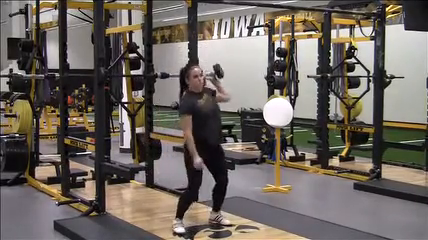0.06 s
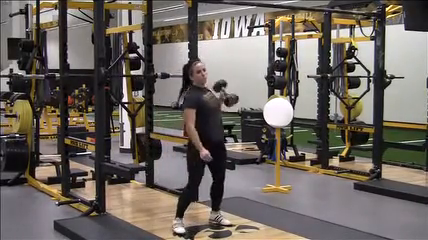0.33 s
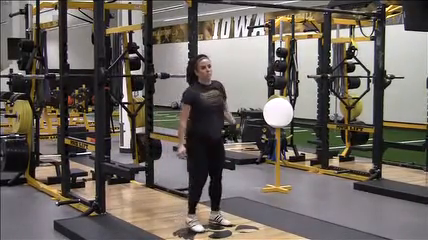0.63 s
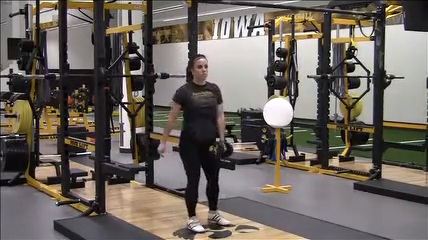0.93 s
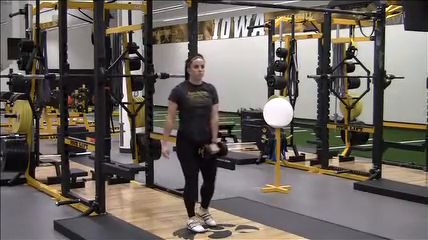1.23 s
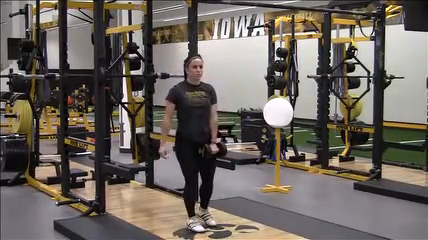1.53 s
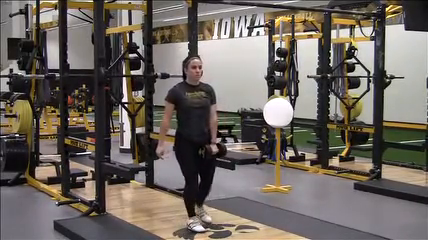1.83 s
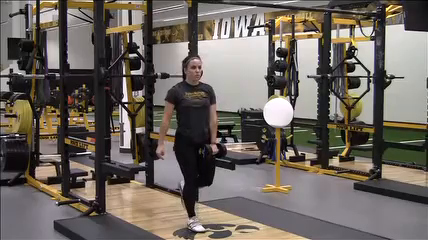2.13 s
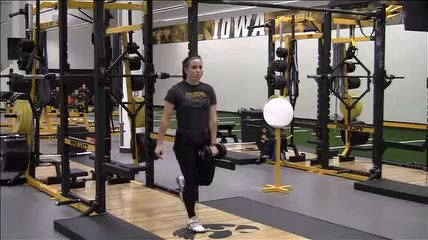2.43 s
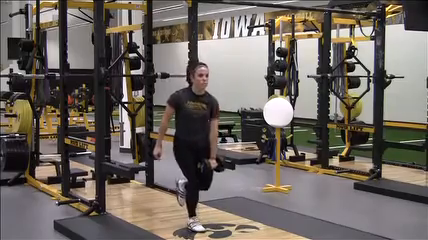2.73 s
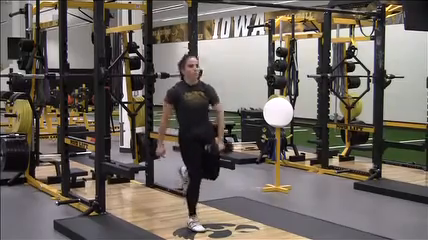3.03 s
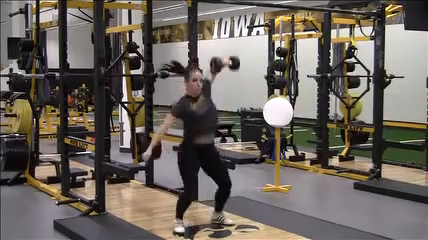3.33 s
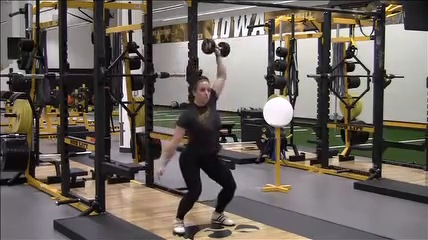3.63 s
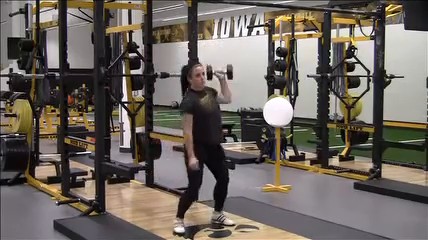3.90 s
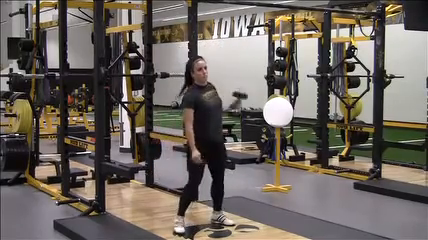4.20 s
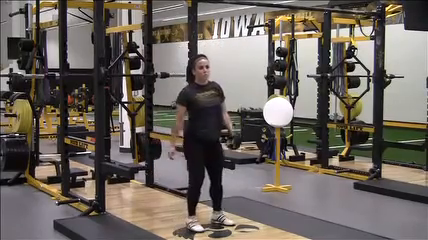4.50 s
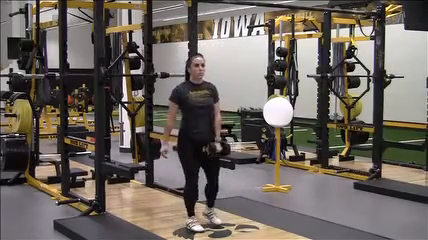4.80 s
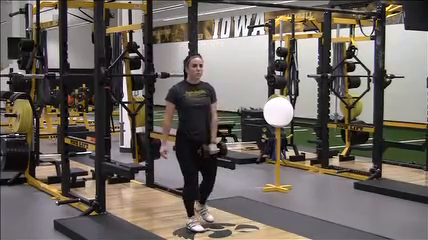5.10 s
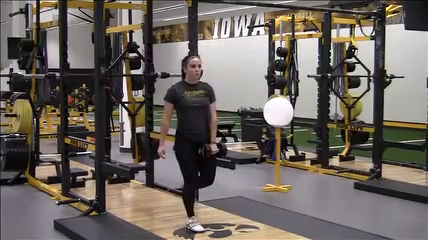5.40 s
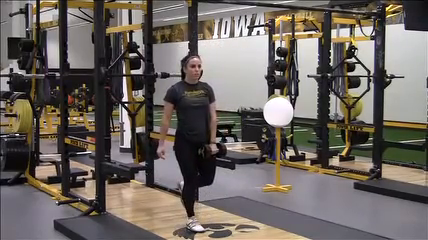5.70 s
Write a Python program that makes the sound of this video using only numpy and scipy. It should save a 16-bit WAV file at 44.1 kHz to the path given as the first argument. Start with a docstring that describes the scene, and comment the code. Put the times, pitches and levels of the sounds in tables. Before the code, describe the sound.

Ventilation rumbles steadily in a large, hard-walled weight room, with faint wavering fan tones. A little past halfway, a lifter's feet land on a wooden platform, making one sharp thud with a slap of flat soles and a knock of boards. The microphone picks up plenty of the room: quick wall echoes, a low boom and faint ringing from steel racks, all fading over about two seconds beneath the ventilation.

```python
"""Ventilation rumbles, with faint fan tones, all the way through in a large, hard weight room.
About 3.5 s in, a lifter catching a dumbbell overhead lands on a wooden platform: a toe touches,
then two hard heels strike 7 ms apart. The boards knock, the soles slap and the walls echo.
The hall rings on with a low boom, and the steel racks ring faintly."""
import sys
import numpy as np
from scipy import signal
from scipy.fft import rfft, irfft
from scipy.io import wavfile

SR = 44100
rng = np.random.default_rng(int(sys.argv[2]) if len(sys.argv) > 2 else 0)


def transcribe(signal):
    """Save signal, clipped to [-1, 1], as a 16-bit WAV file at the path in sys.argv[1]."""
    frames = np.atleast_2d(signal).T
    limited = np.clip(frames, -1, 1)
    pcm = np.round(limited * 32767).astype(np.int16)
    wavfile.write(sys.argv[1], SR, pcm)


N = 253575
TIME = np.arange(N) / SR

# Toe, heel, heel. Each row: start in seconds, push in dB, contact time in seconds, sole slap in dB.
FOOT_CONTACTS = [(3.5123, -31, .0015, -34), (3.5158, -6.5, 0.00074, -8), (3.5227, -6, 0.001415, -2.5)]
FIRST_HEEL_S = FOOT_CONTACTS[1][0]


def gain_of(db):
    """Turns decibels into a number to multiply a sound by."""
    return 10 ** (np.asarray(db) / 20)


def evened(x):
    """Scales a signal to an average size (rms) of 1."""
    return x / np.sqrt(np.mean(x ** 2) + 1e-20)


def read(points, hz):
    """Reads between a table's rows, giving each octave equal room."""
    row_hz, value = np.transpose(points)
    return np.interp(np.log(hz + 1), np.log(row_hz + 1), value)


def add(mix, start_s, sound):
    """Mixes a sound in at its start time."""
    part = mix[max(round(start_s * SR), 0):][:len(sound)]
    part += sound[:len(part)]


def coloured(x, spectrum):
    """Turns each frequency up or down as a table says."""
    hz = np.fft.rfftfreq(len(x), 1 / SR)
    return irfft(rfft(x) * gain_of(read(spectrum, hz)), len(x))


def noise(spectrum, size):
    """Noise of average size 1, coloured by a table."""
    return evened(coloured(rng.standard_normal(size), spectrum))


def drift(rate_hz):
    """A slow random wander of average size 1."""
    hz = np.fft.rfftfreq(N, 1 / SR)
    return evened(irfft(rfft(rng.standard_normal(N)) * np.exp(-(hz / rate_hz) ** 2), N))


def ventilation(air_db=-36.5, swell_db=0.38, waver=0.99, wander_radians=0.68):
    """Air rumbles and hisses in the ducts, and the fans hum with wavering tones."""
    # Duct noise. Each row: frequency in Hz, relative level in dB.
    air_colour = [(12, -13), (33, -1.5), (58, 2), (88, -6.5), (112, -6), (190, -11.5), (330, -12),
                  (480, -18.5), (950, -26.5), (1650, -32.5), (2300, -41), (3200, -40.5), (6000, -45),
                  (10000, -48)]
    # Fan tones. Each row: pitch in Hz, average level in dB before the wavering.
    fan_tones = [(59.2, -53.5), (285, -59), (520, -68), (635.2, -62), (1031, -71), (1410, -73.5)]
    air = gain_of(air_db) * noise(air_colour, size=N) * gain_of(swell_db * drift(rate_hz=3.8))
    hum = np.zeros(N)
    for hz, db in fan_tones:
        level = np.sqrt(2) * gain_of(db) * (1 + waver * drift(rate_hz=2.6))
        hum += level * np.sin(2 * np.pi * hz * TIME + wander_radians * drift(rate_hz=1.7))
    return air + hum


def feet(thump_db=-7, slap_db=-8, scuff_db=-37, scuff_s=0.0097):
    """Each contact is a short push that rings the boards, with a slap as the sole closes on the wood."""
    # The boards' tones. Each row: pitch in Hz, relative level in dB, seconds to fade by 60 dB.
    board_tones = [(104, -32, 0.15), (200, -21, 0.064), (334, -19, 0.12), (470, -19, 0.022),
                   (729, -21, 0.1), (1040, -20, .06), (1484, -5.5, 0.025), (1680, -1, 0.025),
                   (1850, -16, 0.017), (2050, -11, 0.034)]
    # A flat sole's slap. Each row: frequency in Hz, boost or cut in dB.
    slap_colour = [(200, -6), (900, 7), (2400, -3), (3500, 10), (4600, 0), (5700, 1.5), (7500, -7.5),
                   (9400, -8.5), (10500, -16)]
    t, knocks, slaps = TIME[:SR // 2], np.zeros(N), np.zeros(N)
    boards = sum(gain_of(db - 60 * t / fade_s) * np.cos(2 * np.pi * hz * t)
                 for hz, db, fade_s in board_tones)
    for start_s, push_db, contact_s, sole_db in FOOT_CONTACTS:
        force = np.sin(np.pi * np.minimum(t / contact_s, 1)) ** 2  # a longer, softer push sounds duller
        ring = signal.fftconvolve(force / force.sum(), boards)[:len(t)]
        add(knocks, start_s, -gain_of(push_db) * (gain_of(thump_db) * force + ring))
        click = gain_of(slap_db) * (t == 0)
        scuff = gain_of(scuff_db) * np.exp(-t / scuff_s) * rng.standard_normal(len(t))  # the sole settles
        add(slaps, start_s + contact_s / 2, gain_of(sole_db) * (click + scuff))
    return knocks + coloured(slaps, slap_colour)


def wall_echoes(sound, band_hz=(350, 5500), nearest_s=0.008, farthest_s=0.041, scatter_db=-18.5, count=7):
    """Near walls and equipment throw the sound back, thinner and a little duller."""
    # One clear echo from each of the two nearest walls. Each row: delay in seconds, relative level in dB.
    near_walls = [(.0292, -7.5), (0.0346, -7.5)]
    echo = signal.lfilter(*signal.butter(1, band_hz, "bandpass", fs=SR), sound)
    out = np.zeros(N)
    for delay_s, db in near_walls:
        add(out, delay_s, gain_of(db) * echo)
    for place in (np.arange(count) + rng.random(count)) / count:  # weak echoes off racks and benches
        add(out, nearest_s + place * (farthest_s - nearest_s), gain_of(scatter_db) * echo)
    return out


def hall_ring(level_db=-28, build_s=0.011, early_db=-3, early_s=0.05,
              far_db=1.5, far_delay_s=0.23, far_spread_s=0.11):
    """Countless echoes blur together, swell as the far walls answer, then fade, the treble first."""
    # The landing as it spreads through the hall. Each row: frequency in Hz, relative level in dB.
    hall_colour = [(40, -14), (100, 3), (170, 0), (340, 3), (520, -3), (700, 1.5), (920, -3), (1060, 1),
                   (1220, -3.5), (1420, -3.5), (1750, -7), (2000, -10.5), (2400, -13.5), (3100, -18),
                   (3800, -19), (5500, -26.5), (7000, -35), (10000, -49)]
    # How long the hall rings. Each row: frequency in Hz, seconds to fade by 60 dB.
    fade_times = [(100, 3.4), (300, 3.13), (700, 2.75), (1500, 3.11), (3000, 2.6), (5000, 1.64),
                  (9000, 0.67)]
    size, out = 5 * SR // 2, np.zeros(N)
    hz, slice_s, bands = signal.stft(noise(hall_colour, size), SR, nperseg=512)
    bands = bands * gain_of(-60 * slice_s / read(fade_times, hz)[:, None])
    tail = signal.istft(bands, SR, nperseg=512)[1][:size]
    t = TIME[:size]
    build_up = 1 - np.exp(-(t / build_s) ** 2)
    early_lift = 1 + gain_of(early_db) * np.exp(-t / early_s)  # scatter off the equipment
    swell_db = far_db * np.exp(-((t - far_delay_s) / far_spread_s) ** 2)
    add(out, FIRST_HEEL_S, gain_of(level_db + swell_db) * build_up * early_lift * tail)
    return out


def steel_racks(rise_s=0.023):
    """The steel frames pick up the heel strike through the floor and ring faintly."""
    # The frames' tones. Each row: pitch in Hz, level in dB, seconds to fade by 60 dB.
    rack_tones = [(632.6, -36.5, 1.8), (723, -40, 1.4), (1030, -45, 1.5), (1300, -59, 0.98),
                  (1370, -41, 2.3), (1346, -42, 1.4), (1700, -45, 1.7), (2050, -54, 0.89), (2110, -57, 1.1),
                  (3070, -50.5, 1.4), (3540, -62, 1.0), (3770, -52, 1.0)]
    t, out = TIME[:2 * SR], np.zeros(N)
    for hz, db, fade_s in rack_tones:
        ring = gain_of(db - 60 * t / fade_s) * np.sin(2 * np.pi * (hz * t + rng.random()))
        add(out, FIRST_HEEL_S, ring * (1 - np.exp(-t / rise_s)))
    return out


def hall_boom(level_db=-36, peak_s=0.27):
    """The weight on the floor stirs the hall's deepest tones, which build slowly and die away."""
    # The deep boom. Each row: frequency in Hz, relative level in dB.
    boom_colour = [(20, -23), (40, 1), (60, 1.5), (90, -2.5), (200, -43), (600, -78)]
    age, out = TIME[:2 * SR] / peak_s, np.zeros(N)
    swell = (age * np.exp(1 - age)) ** 2
    add(out, FIRST_HEEL_S, gain_of(level_db) * swell * noise(boom_colour, size=len(age)))
    return out


def scene():
    """The landing in its room, over the ventilation."""
    landing = feet()
    room = wall_echoes(landing) + hall_ring() + steel_racks()
    return (landing + room + ventilation() + hall_boom())[None]


def record(dry, cutoff_hz=10450):
    """Cuts away the highest treble."""
    low_pass = signal.firwin(401, cutoff_hz, window=("kaiser", 7), fs=SR)
    return signal.oaconvolve(dry, low_pass[None], "same")


dry = scene()
out = record(dry)
transcribe(out)
```